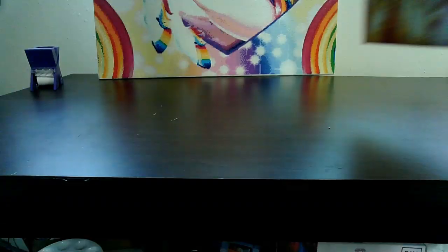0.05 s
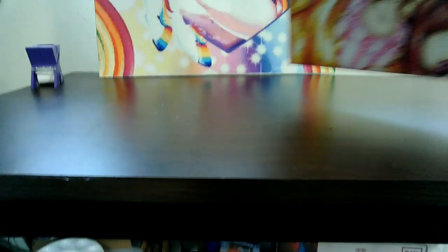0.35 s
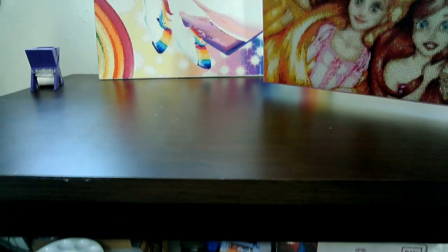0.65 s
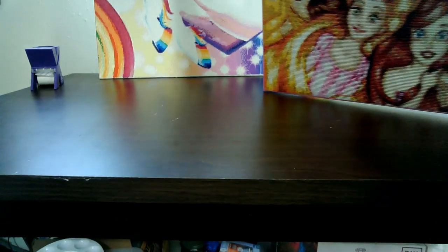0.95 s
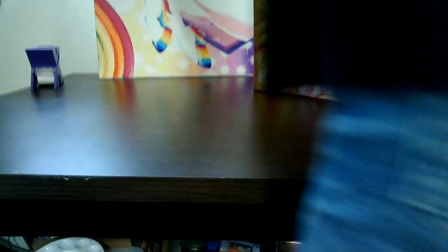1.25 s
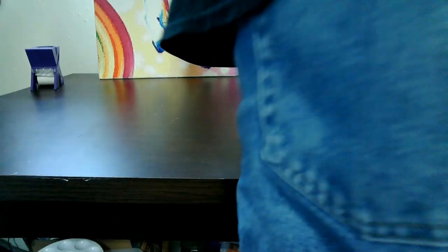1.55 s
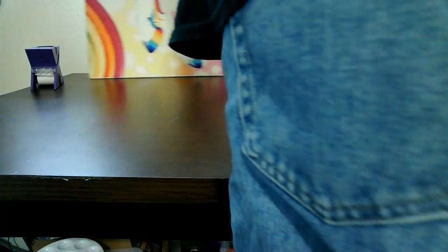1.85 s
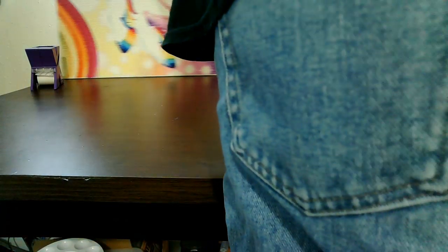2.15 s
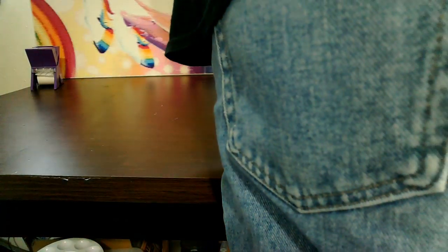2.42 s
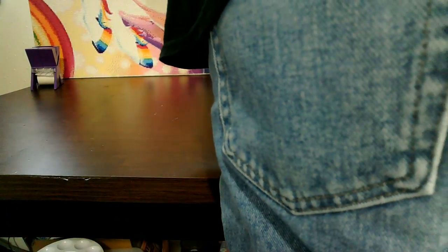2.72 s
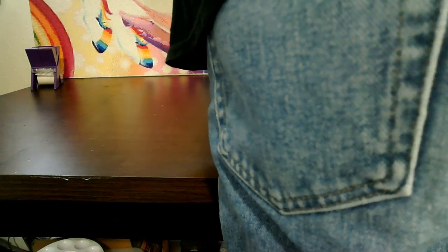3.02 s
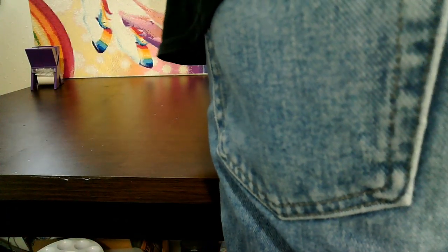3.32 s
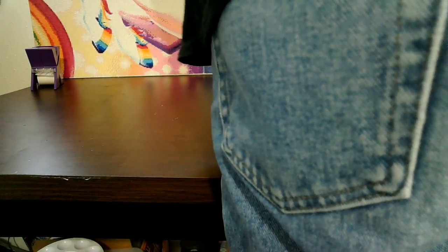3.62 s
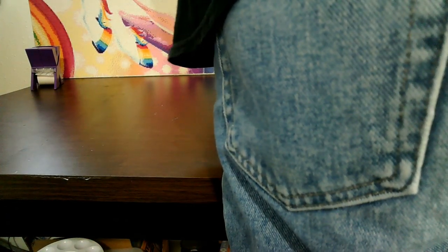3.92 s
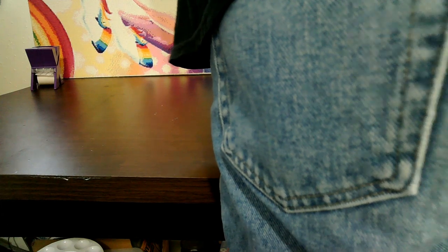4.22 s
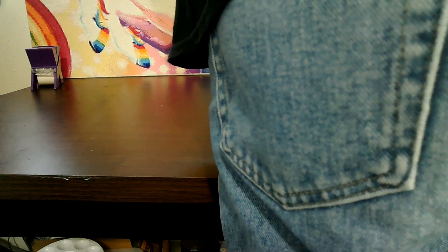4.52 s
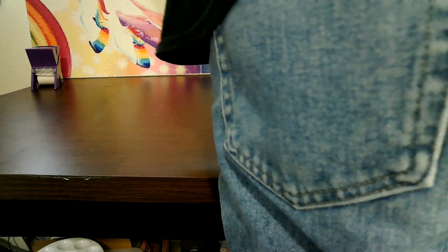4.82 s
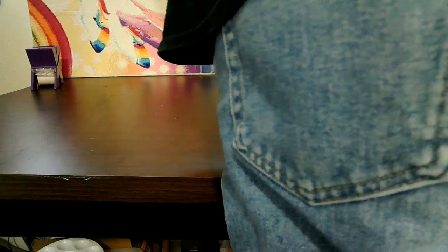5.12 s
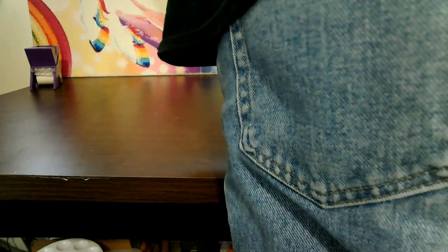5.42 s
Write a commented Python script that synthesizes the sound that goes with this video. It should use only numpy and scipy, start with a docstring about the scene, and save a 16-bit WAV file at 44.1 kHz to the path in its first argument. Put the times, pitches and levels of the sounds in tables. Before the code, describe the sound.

In a room with a low hum and a faint electrical whine, a wooden picture frame knocks down onto a desk, heard close from the desktop. The canvas hisses briefly along the wall, and the frame bumps and clacks amid soft rustling of sleeves. The strongest thump comes with two short scraping pushes and a tiny squeak, followed by one last gentle bump and a few faint ticks.

```python
"""Over a room's low hum and a faint whine, sleeves rustle and a canvas on a wooden frame is set on a desk:
impact makes the frame clack and the desk boom in its modes. From 1.6 s the cloth slides along the wall
with a hiss of friction. More bumps and clacks follow, and near 4.3 s two shoves wedge it into place
with a stick-slip rasp and a thin squeak. A last soft bump and five faint ticks end the scene.
A small microphone pair standing on the desk hears it all."""
import sys
import numpy as np
from scipy import signal
from scipy.fft import rfft, irfft, next_fast_len
from scipy.io import wavfile

SR = 44100
rng = np.random.default_rng(int(sys.argv[2]) if len(sys.argv) > 2 else 0)


def file_out(sig):
    """Save sig as 16-bit WAV at sys.argv[1]."""
    # one column per channel
    cols = np.atleast_2d(sig).T
    # limit, then scale
    lim = np.clip(cols, -1, 1)
    pcm = np.round(lim * 32767).astype(np.int16)
    wavfile.write(sys.argv[1], SR, pcm)


N = 249604
T = np.arange(N) / SR
LN_1000 = np.log(1000)  # amplitude falls a thousandfold in one decay time, t60


def amp(db):
    """Decibels as an amplitude ratio."""
    return 10 ** (np.asarray(db) / 20)


def unit(x):
    """Normalisation to rms 1."""
    return x / np.sqrt(np.mean(x ** 2) + 1e-20)


def curve(points, hz):
    """Interpolation on a log-frequency axis."""
    f, value = np.transpose(points)
    return np.interp(np.log(hz + 1), np.log(f + 1), value)


def add(mix, start, sound):
    """Superposition of a sound from its start in seconds."""
    part = mix[:, round(start * SR):][:, :sound.shape[-1]]
    part += sound[..., :part.shape[-1]]


def tilted(hz, tilt_db):
    """Gain of a spectral slope in dB per octave through the mid range."""
    return amp(tilt_db * np.log2(np.clip(hz, 400, 8000) / 2000))


def coloured(x, spectrum, tilt_db=0):
    """Spectral shaping, to rms 1."""
    hz = np.fft.rfftfreq(x.shape[-1], 1 / SR)
    return unit(irfft(rfft(x) * amp(curve(spectrum, hz)) * tilted(hz, tilt_db), x.shape[-1]))


def noise(spectrum, size, tilt_db=0, grain_db=0):
    """Stereo coloured noise of rms 1; grain is fast random amplitude modulation."""
    white = rng.standard_normal((2, size))
    catches = np.repeat(np.minimum(rng.exponential(1, size // 32 + 1), 4), 32)[:size]
    return coloured(white * amp(grain_db * catches), spectrum, tilt_db)


def narrowband(hz, width_hz, size):
    """Narrow-band noise of rms 1, heard as a wavering tone."""
    f = np.fft.rfftfreq(N, 1 / SR)
    band = rfft(rng.standard_normal(N)) / (1 + (2 * (f - hz) / width_hz) ** 4)
    return unit(irfft(band, N)[:size])


def wander(low_hz, high_hz):
    """Slow sinusoids of random phase sum to a random curve of rms 1."""
    t, rates = T[::64], np.geomspace(low_hz, high_hz, num=16)
    slow = sum(np.sin(2 * np.pi * (f * t + rng.random())) / np.sqrt(f) for f in rates)
    return unit(np.interp(T, t, slow))


# Room noise before its tilt, and draught. Each row: frequency in Hz, relative spectral density in dB.
AIR_SPECTRUM = [(12, -60), (20, 2), (44, -10.5), (110, -14.5), (167, -20.5), (215, -21), (300, -23),
                (375, -29.5), (408, -23), (496, -33), (539, -32), (866, -40), (3600, -45), (6290, -44),
                (15800, -49)]
DRAUGHT_SPECTRUM = [(1, -33), (4, -14), (9, 5.5), (18, -9.5), (30, -104), (80, -103)]
# The room's hum. Each row: frequency in Hz, bandwidth in Hz, level in dB.
HUM_BANDS = [(118.25, 8.8, -55.5), (212.9, 10.2, -61.5), (302.4, 3.9, -67), (406.4, 7.1, -71),
             (466.7, 12.3, -70.5)]
def background():
    """Stationary noise: broadband air, a narrow-band hum and a slow draught on the microphone."""
    hum = sum(amp(db) * narrowband(hz, width, N) for hz, width, db in HUM_BANDS)
    air = amp(-40.5) * noise(AIR_SPECTRUM, N, tilt_db=1.0)
    draught = amp(-33.5) * noise(DRAUGHT_SPECTRUM, N)
    return air + hum + draught


# Strands of the whine. Each entry: offset from the carrier in Hz.
WHINE_OFFSETS = [-1300, 0, 1100]
def whine():
    """Frequency modulation: the strands of an electrical whine wander loosely together as they waver."""
    carrier_hz, swing_hz, fade_db = 9000, 900, 2.5
    shared, out = wander(.8, 8), np.zeros(N)
    for offset_hz in WHINE_OFFSETS:
        shift_hz = offset_hz + swing_hz * (shared + .5 * wander(1, 14))
        carrier = signal.hilbert(narrowband(carrier_hz, width_hz=200, size=N), next_fast_len(N))[:N]
        strand = (carrier * np.exp(2j * np.pi * np.cumsum(shift_hz) / SR)).real
        out += amp(fade_db * wander(2, 16)) * strand
    return amp(-68.5) * unit(out)


# The room's decay. Each row: frequency in Hz, reverberation time in seconds.
ROOM_T60 = [(150, 1), (660, 0.34), (1800, 0.21), (5000, 0.28), (14000, 0.23)]
def reverberation(x):
    """A diffuse field decays at its own rate in each band; the furnishings absorb treble."""
    hz, t, bands = signal.stft(rng.standard_normal((2, SR // 2)), SR, nperseg=256)
    tail = signal.istft(bands * amp(-60 * t / curve(ROOM_T60, hz)[:, None]), SR, nperseg=256)[1]
    tail *= np.clip(T[:tail.shape[1]] / 0.011, 0, 1) ** 2  # builds over 11 ms
    absorption = tilted(np.fft.rfftfreq(tail.shape[1], 1 / SR), tilt_db=-0.8)
    tail = irfft(rfft(tail / np.linalg.norm(tail[0])) * absorption)
    return signal.fftconvolve(x, tail, axes=1)[:, :N]


# Early reflections off desk and walls. Each row: delay in seconds, gain in dB.
REFLECTIONS = [(.0021, -22), (.00606, -17), (.0087, -15.5)]
def reflected(x):
    """Comb filtering: delayed copies interfere with the direct sound."""
    out = x.copy()
    for delay, db in REFLECTIONS:
        add(out, delay, amp(db) * x)
    return out


# The tick's colour. Each row: frequency in Hz, relative spectral density in dB.
TICK_SPECTRUM = [(300, -9), (1200, 10.5), (3500, -20), (4800, 3), (7500, -10), (10000, -4), (15500, -21)]
# Faint dry ticks. Each row: start in seconds, relative level in dB.
TICK_EVENTS = [(5.1983, -49.5), (5.3028, -46.5), (5.4073, -49.5), (5.5118, -47), (5.6163, -47.5)]
def ticks():
    """One exponentially damped noise burst repeats at an even pace."""
    out, t = np.zeros((2, N)), T[:1024]
    tick = unit(noise(TICK_SPECTRUM, len(t)) * np.exp(-t / .0012)) * amp(-14.5)
    for start, db in TICK_EVENTS:
        add(out, start, amp(db) * tick)
    return out


def stroke(t, rise_s, hold_s, t60):
    """Envelope of linear rise, hold and exponential decay."""
    return np.clip(t / rise_s, 0, 1) * np.exp(-LN_1000 * np.maximum(t - rise_s - hold_s, 0) / t60)


# Rustling cloth. Each row: frequency in Hz, relative spectral density in dB.
SLEEVE_SPECTRUM = [(200, 1), (600, 9), (1400, 9), (3000, 3), (5500, -0.5), (8000, -2), (10500, -8.5),
                   (15500, -1.5)]
# Hands and sleeves. Each row: start in seconds, t60 in seconds, level in dB, tilt in dB per octave.
SLEEVE_STROKES = [(.22, 1.3, -57.5, -0.5), (.61, 2.1, -57.5, 4), (.94, 1.43, -55, 1),
                  (2.29, 0.81, -51, -2.5), (2.505, 1.15, -50.5, -1), (2.779, 0.3, -50, 1),
                  (3.299, 1.4, -53.5, -5), (3.43, 0.47, -58, 2), (4.088, 0.68, -45.5, -1.5),
                  (4.196, 1.06, -41.5, -3.5), (4.222, 0.25, -43.5, 7), (4.57, 0.88, -59.5, -1.5),
                  (4.695, 0.15, -52, 4)]
def sleeves():
    """Friction noise swells and dies away with each short brush of cloth."""
    out, t = np.zeros((2, N)), T[:SR // 2]
    for start, t60, db, tilt_db in SLEEVE_STROKES:
        envelope = stroke(t, rise_s=0.022 * t60, hold_s=0, t60=t60)
        add(out, start, amp(db) * envelope * noise(SLEEVE_SPECTRUM, len(t), tilt_db))
    return out


# The desk top's rumble. Each row: frequency in Hz, relative spectral density in dB.
SCUFF_SPECTRUM = [(50, -14), (130, -1.5), (220, 2), (320, 0), (430, -11.5), (700, -20), (3000, -33)]
# Drags of the frame's foot. Each row: start in seconds, length in seconds, level in dB.
SCUFF_EVENTS = [(2.248, 0.094, -43.5), (4.065, .12, -40), (4.481, .2, -44.5)]
def scuffs():
    """Friction of the frame forces the desk top into low random vibration."""
    out = np.zeros((2, N))
    for start, length, db in SCUFF_EVENTS:
        size = int(length * SR)
        add(out, start, amp(db) * np.sin(np.pi * T[:size] / length) * noise(SCUFF_SPECTRUM, size))
    return out


# The desk's modes. Each row: frequency in Hz, relative level in dB, t60 in seconds before damping.
DESK_MODES = [(89.9, 4, 0.22), (135.3, 7.5, 0.21), (238, 1.5, 0.14), (273.6, 5, 0.086), (297, 7, 0.042),
              (450, -1, 0.045), (700, -8, 0.13), (855, -2, 0.088)]
# Bumps on the desk. Each row: start in seconds, level in dB, hardness as a cutoff in Hz.
DESK_BUMPS = [(0.5589, -29, 695), (0.5629, -36, 403), (.578, -28, 105), (.783, -35, 303),
              (1.024, -25.5, 123), (1.391, -34.5, 121), (1.767, -34.5, 70), (2.28, -37, 170),
              (2.778, -23, 118), (3.711, -41.5, 420), (3.738, -36, 200), (4.068, -34, 219),
              (4.223, -15, 135), (4.265, -25.5, 220), (4.283, -32, 380), (5.121, -33.5, 101)]
# Shifts of weight that rock the desk on its legs. Each row: start in seconds, level in dB.
DESK_ROCKS = [(0.558, -23.5), (0.783, -31), (1.025, -36), (1.769, -31), (2.781, -35)]
def desk():
    """Modal response to impact: harder bumps start faster, reach higher modes and damp them more."""
    out, t = np.zeros((2, N)), T[:SR // 2]
    soft_hz, sway_hz, sway_decay_s = 134, 31.7, 0.067
    for start, db, cutoff_hz in DESK_BUMPS:
        swell = 1 - np.exp(-t * cutoff_hz / 1.63)
        t60_factor = 0.71 * (soft_hz / cutoff_hz) ** 0.28  # a hard bump presses on
        boom = np.zeros(len(t))
        for hz, mode_db, t60 in DESK_MODES:
            drive = amp(mode_db) / np.hypot(1, (hz / cutoff_hz) ** 2)
            boom += drive * np.sin(2 * np.pi * hz * t) * np.exp(-LN_1000 * t / (t60 * t60_factor))
        add(out, start, amp(db) * boom * swell)
    for start, db in DESK_ROCKS:
        add(out, start, amp(db) * np.sin(2 * np.pi * sway_hz * t) * np.exp(-t / sway_decay_s))
    return out


# The frame's modes. Each row: frequency in Hz, relative level in dB, t60 in seconds.
FRAME_MODES = [(666, 0, 0.06), (770, -3, 0.18), (882, -4, 0.13), (1004, -8, 0.07), (1278, -4, 0.095),
               (1400, 2, 0.036), (1540, -4.5, 0.063), (1810, -7, 0.065), (2440, -9, 0.036),
               (2840, -4, 0.041), (2940, -2.5, 0.049)]
def frame_ring(centre_hz):
    """Free vibration of the frame: the point of contact favours the modes near one frequency."""
    t, spread_octaves, rise_s = T[:SR // 3], 0.92, 0.001
    modes = np.zeros((2, len(t)))
    for hz, db, t60 in FRAME_MODES:
        drive = amp(db) * np.exp(-(np.log2(hz / centre_hz) / spread_octaves) ** 2)
        phase = rng.random((2, 1)) / 4
        modes += drive * np.exp(-LN_1000 * t / t60) * np.sin(2 * np.pi * (hz * t + phase))
    return modes * (1 - np.exp(-t / rise_s))


# Wood chatter and contact snap. Each row: nominal frequency in Hz, relative spectral density in dB.
WOOD_SPECTRUM = [(150, 2.5), (480, 0), (850, 4), (1500, 7), (2150, 7), (3200, -6.5), (6000, -8), (9000, -8),
                 (15500, -19)]
SNAP_SPECTRUM = [(400, -19), (4000, -22), (7300, 6.5), (9500, -7), (16000, 5.5)]
def contact(tilt_db, pitch, ring_db, centre_hz, snap_db):
    """An impact transient on wood: a crisp snap, a burst of chatter and the ringing of the modes."""
    t, snap_decay_s = T[:SR // 3], 0.0025
    t60 = 0.028 * 2 ** -tilt_db  # duller chatter lasts longer
    spectrum = [(hz * pitch, db) for hz, db in WOOD_SPECTRUM]  # a corner sounds higher than a flat
    chatter = noise(spectrum, len(t), tilt_db, grain_db=-1.0) * np.exp(-LN_1000 * t / t60)
    snap = amp(snap_db) * noise(SNAP_SPECTRUM, len(t)) * np.exp(-t / snap_decay_s)
    return snap + chatter + amp(ring_db) * frame_ring(centre_hz)


# Clacks of the frame. Each row: start in seconds, level in dB, chatter tilt in dB per octave,
# chatter pitch as a factor, relative ringing in dB, its centre in Hz, relative snap in dB.
FRAME_CLACKS = [(0.5592, -38.5, -0.7, 0.88, -17, 1300, 4.5), (0.5671, -41, -1.5, 1.1, -13, 1500, -10),
                (.5705, -44, -2, 1.0, -13, 1500, -8), (.677, -48.5, -2, 0.92, -16, 1300, -9),
                (0.754, -47, 3, 0.64, -27, 1300, -1), (0.788, -44, 1, 0.65, -19, 1300, -2),
                (.86, -45.5, 1, 0.59, -27, 1300, -6), (3.682, -45, 2, 0.73, -13, 1300, -8),
                (3.706, -37.5, -2.5, 0.77, -10, 1100, -16), (3.712, -36.5, -1.0, 0.66, -7, 950, -7),
                (3.727, -42, -2, 0.55, -9, 900, -5), (3.74, -41, -2, 0.6, -5, 900, -8),
                (3.787, -48, 0, 0.92, -16, 900, -7), (4.2808, -32.5, -0.8, 1.34, 6, 1970, 2.5),
                (4.3111, -42.5, -2.5, 1.4, -6, 1900, -1), (4.337, -43, 7, 0.72, -17, 1200, 5)]
def clacks():
    """Elastic collision: a hard clack rebounds once, weaker, and the room reverberates."""
    out = np.zeros((2, N))
    hard_db, rebound_s, rebound_db = -40, .004, -9
    for start, db, tilt_db, *touch in FRAME_CLACKS:
        add(out, start, amp(db) * contact(tilt_db, *touch))
        if db > hard_db:
            add(out, start + rebound_s, amp(db + rebound_db) * contact(tilt_db + 1, *touch))
    return out + amp(-3) * reverberation(out)


# Squeaks as the frame wedges in. Each row: start and length in seconds, frequency in Hz, level in dB.
EDGE_SQUEAKS = [(4.285, 0.02, 14480, -37), (4.302, 0.028, 14450, -34)]
def squeaks():
    """Very fast stick-slip oscillation of the wedged edge gives a thin tone."""
    out = np.zeros((2, N))
    for start, length, hz, db in EDGE_SQUEAKS:
        size = int(length * SR)
        tone = np.array([narrowband(hz, width_hz=220, size=size) for _ in range(2)])
        add(out, start, amp(db) * signal.windows.tukey(size, .5) * tone)
    return out


# The threads' crackle. Each row: frequency in Hz, relative spectral density in dB.
THREAD_SPECTRUM = [(300, -25), (1500, -8), (4500, -16), (6500, -16), (9000, -1.5), (11500, -6), (15500, 6)]
def thread_crackle():
    """Shot noise of rms 1: single threads snap free at random, in uneven sizes."""
    snaps_per_s, spread_db, decay_s = 900, 4.5, .0003
    onsets = rng.random(N) < snaps_per_s / SR
    sizes = amp(spread_db * np.minimum(rng.exponential(1, N), 3))
    bursts = signal.lfilter([1], [1, -np.exp(-1 / (decay_s * SR))], onsets * sizes)
    return coloured(bursts * rng.standard_normal((2, N)), THREAD_SPECTRUM)


# The stretched cloth's resonances. Each row: frequency in Hz, bandwidth in Hz, relative gain in dB.
CANVAS_MODES = [(4830, 190, -3), (5290, 100, -2), (5800, 80, -4), (6040, 120, -3), (8400, 230, 1.5),
                (10550, 170, -2), (11550, 220, -3), (14020, 200, 1), (15500, 400, 1)]
def canvas_ring(rub, centre_hz):
    """Forced resonance of a membrane: a rub favours the modes near its own centre."""
    out, spread_octaves = np.zeros_like(rub), 0.75
    for hz, width, db in CANVAS_MODES:
        drive = amp(db) * np.exp(-(np.log2(hz / centre_hz) / spread_octaves) ** 2)
        out += drive * signal.lfilter(*signal.iirpeak(hz, hz / width, SR), rub)
    return out


# Light rubbing. Each row: frequency in Hz, relative spectral density in dB.
SLIDE_SPECTRUM = [(200, 2.5), (600, -6), (1500, -5.5), (3900, -6), (4900, -4), (6700, -5), (9000, -3.8),
                  (12000, -2.8), (15500, 3.2)]
def slide():
    """Sliding friction: the weave's catches on the wall grow louder, brighter and ring more with speed."""
    start_s, length_s = 1.619, 0.92
    progress = np.clip((T - start_s) / length_s, 0, 1)
    speed = abs(np.sin(np.pi * progress ** 0.83))  # top speed comes early
    rub = noise(SLIDE_SPECTRUM, N, grain_db=1.0) + amp(-9) * thread_crackle()
    treble = signal.sosfiltfilt(signal.butter(2, 8000, "high", fs=SR, output="sos"), rub)
    hiss = rub - treble + speed ** 0.69 * treble
    ring = amp(-11) * speed ** 6 * canvas_ring(rub, centre_hz=4700)
    return amp(-35) * speed ** 1.68 * (hiss + ring)


# Hard rubbing. Each row: frequency in Hz, relative spectral density in dB.
RASP_SPECTRUM = [(200, 14), (600, -1.5), (780, -10), (1000, 2.5), (1500, 2.5), (2400, -3), (4200, -5),
                 (5200, 0.5), (6200, -5.5), (7500, -8), (10500, -9), (15000, -4)]
# Shoves that wedge the canvas in. Each row: start and hold in seconds, level in dB,
# relative frame ringing in dB, relative cloth ringing in dB, its centre in Hz.
WEDGING_SHOVES = [(4.278, 0.008, -32, -14, 2, 10000), (4.329, 0.035, -31.5, -22, -6, 5100)]
def shoves():
    """Stick-slip friction under load: the canvas rasps and judders, driving cloth and frame to ring."""
    out, t = np.zeros((2, N)), T[:SR // 2]
    judder_db = narrowband(hz=70, width_hz=77, size=N)
    for start, hold, db, frame_db, cloth_db, centre_hz in WEDGING_SHOVES:
        rasp = noise(RASP_SPECTRUM, len(t), grain_db=0.5) + amp(-5) * thread_crackle()[:, :len(t)]
        wood = unit(signal.oaconvolve(rasp, frame_ring(centre_hz=1490), axes=1)[:, :len(t)])
        sound = rasp + amp(frame_db) * wood + amp(cloth_db) * canvas_ring(rasp, centre_hz)
        add(out, start, amp(db) * stroke(t, rise_s=0.007, hold_s=hold, t60=0.38) * sound)
    return amp(judder_db) * out


# Microphone ports, left then right. Each row: frequency in Hz, bandwidth in Hz, peak gain in dB.
PORT_RESONANCES = [(5440, 1140, 16.5), (6510, 870, 16.5)]
def ports(x):
    """Cavity resonance before each capsule lifts a band of treble."""
    return np.array([side + (amp(db) - 1) * signal.lfilter(*signal.iirpeak(hz, hz / width, SR), side)
                     for side, (hz, width, db) in zip(x, PORT_RESONANCES)])


def scene():
    """Airborne sound enters by the ports; structure-borne sound from the desk reaches the pair directly."""
    airborne = clacks() + squeaks() + reflected(slide() + shoves()) + sleeves() + ticks()
    return ports(airborne) + desk() + scuffs() + background() + whine()


# Likeness of the channels. Each row: frequency in Hz, left-right correlation given to independent noise.
PAIR_CORRELATION = [(100, 0.91), (350, 0.76), (1000, 0.45), (2500, -0.042), (6000, -0.14), (12000, -0.21)]
# Balance of the channels. Each row: frequency in Hz, left minus right in dB.
PAIR_BALANCE = [(120, -0.5), (300, 2.5), (600, 3.5), (2500, -0.5), (5000, -1.5), (8000, -2.5),
                (15000, -1.3)]
def record(dry):
    """Spatial coherence: two close capsules hear the bass alike and the treble apart, up to a band limit."""
    hz, limit_hz = np.fft.rfftfreq(N, 1 / SR), 15850
    left, right = rfft(dry)
    correlation = np.clip(curve(PAIR_CORRELATION, hz), -.99, .99)
    balance = amp(curve(PAIR_BALANCE, hz) / 2)
    mid = (left + right) / 2 * np.sqrt(1 + correlation)
    side = (left - right) / 2 * np.sqrt(1 - correlation)
    pair = irfft(np.array([(mid + side) * balance, (mid - side) / balance]), N)
    lowpass = signal.firwin(511, limit_hz, window=("kaiser", 9), fs=SR)
    return signal.oaconvolve(pair, lowpass[None], "same")


dry = scene()
out = record(dry)
file_out(out)
```